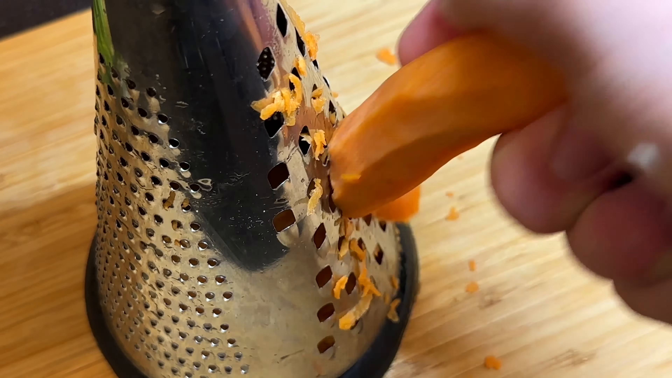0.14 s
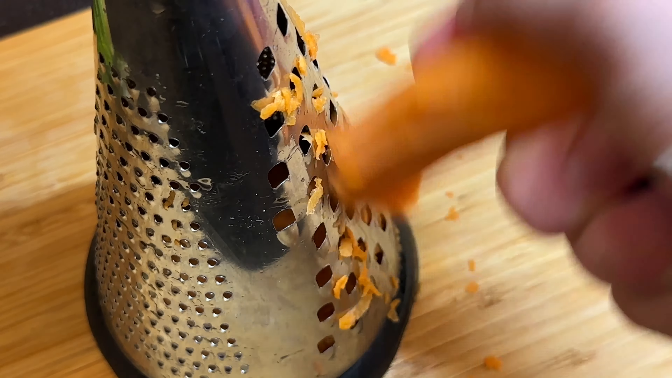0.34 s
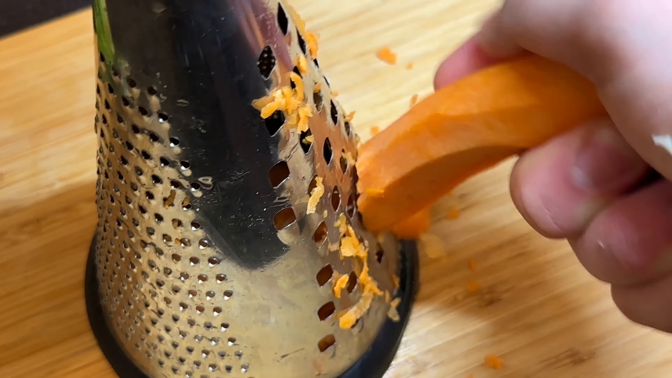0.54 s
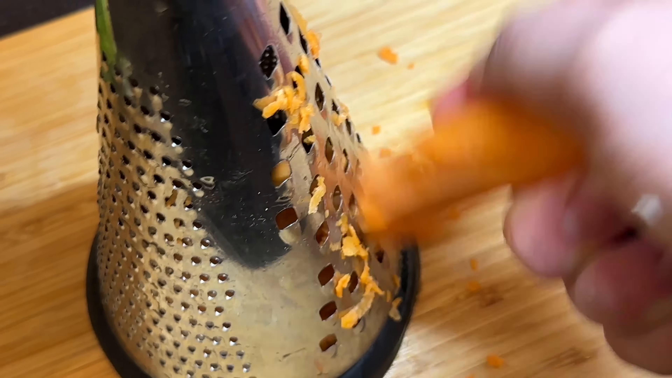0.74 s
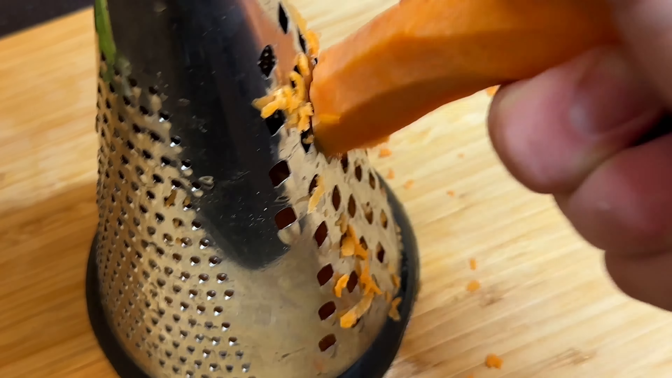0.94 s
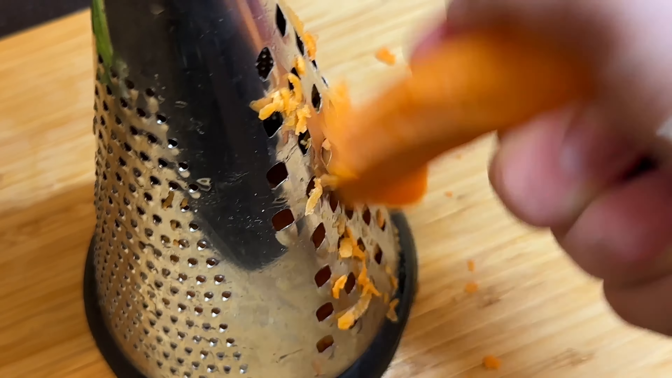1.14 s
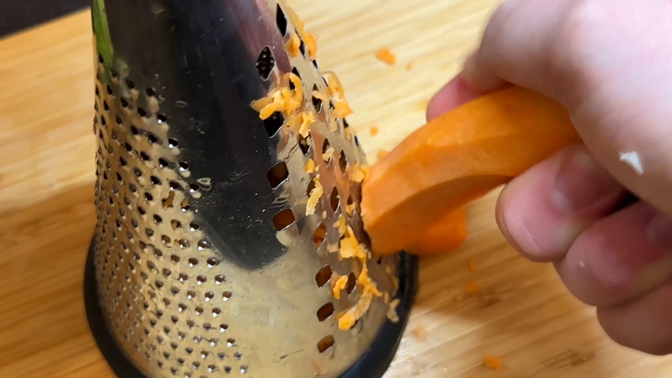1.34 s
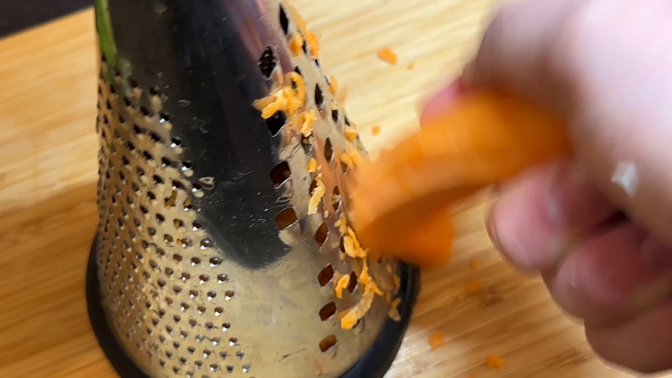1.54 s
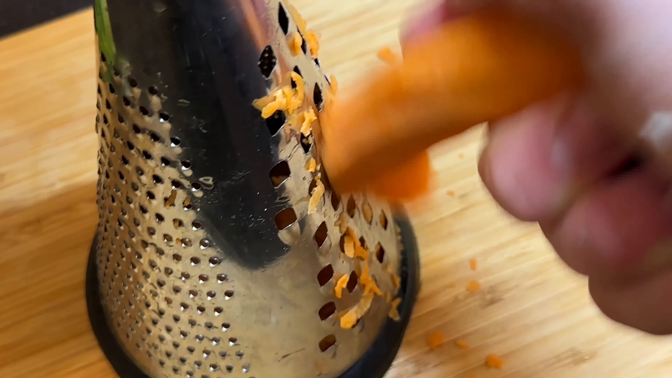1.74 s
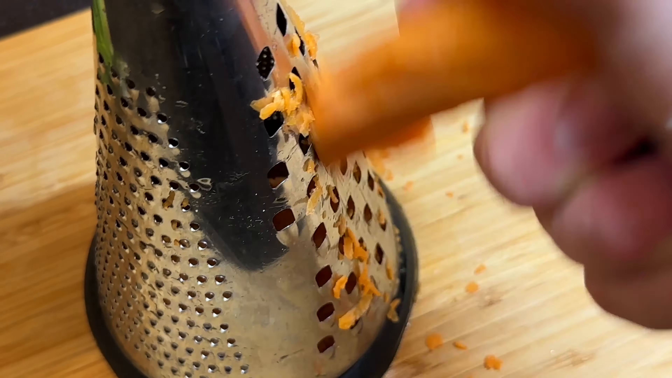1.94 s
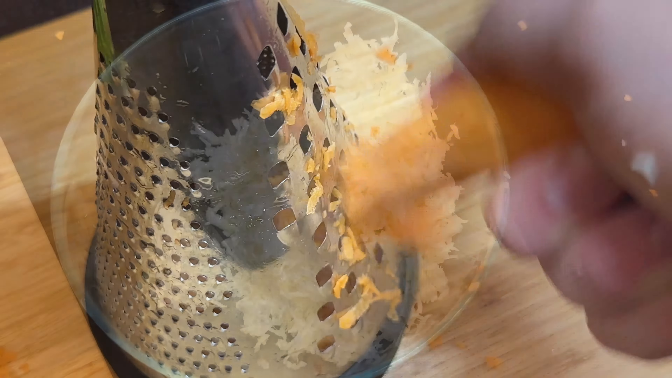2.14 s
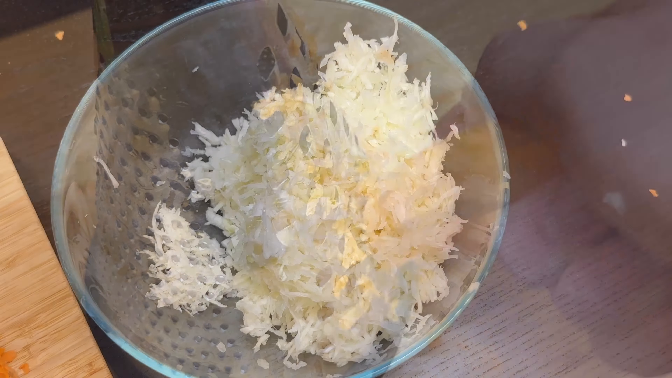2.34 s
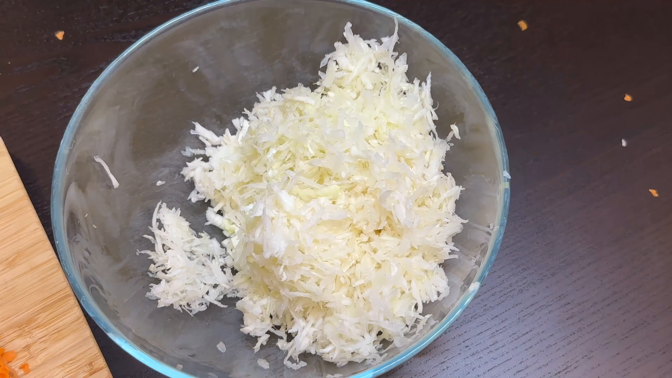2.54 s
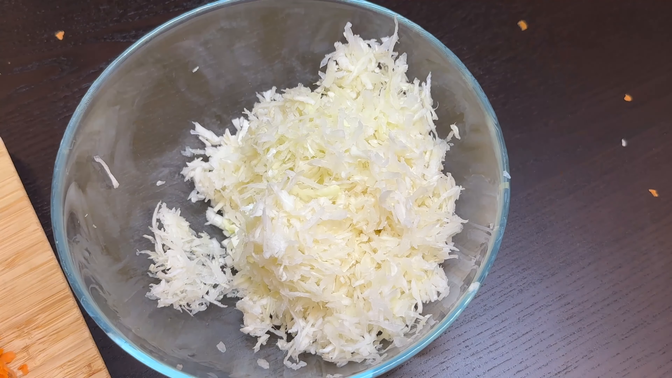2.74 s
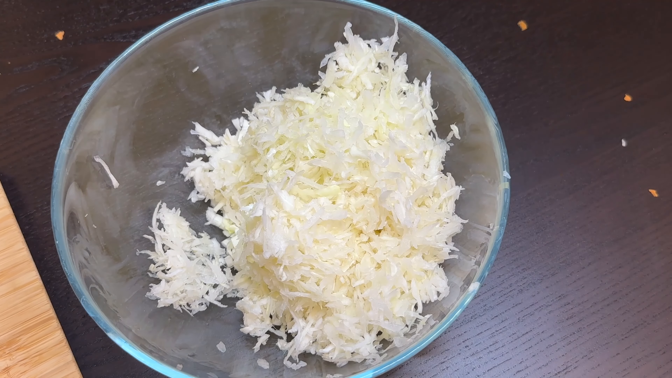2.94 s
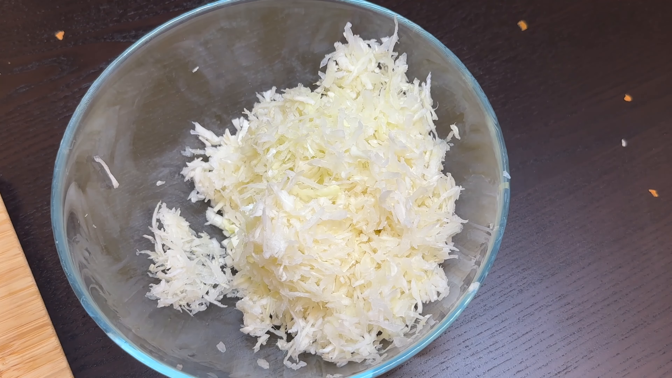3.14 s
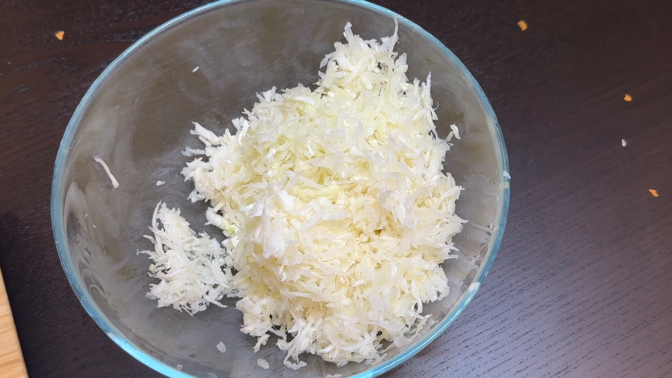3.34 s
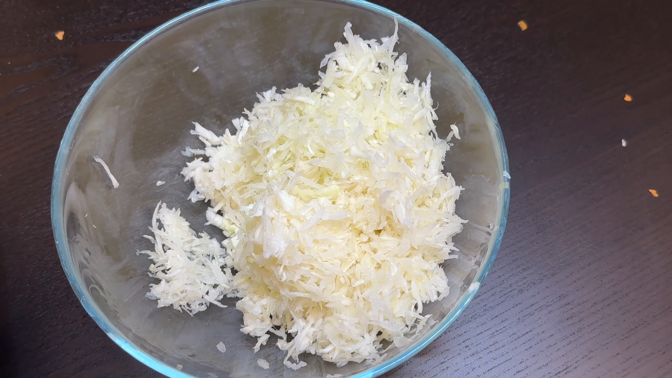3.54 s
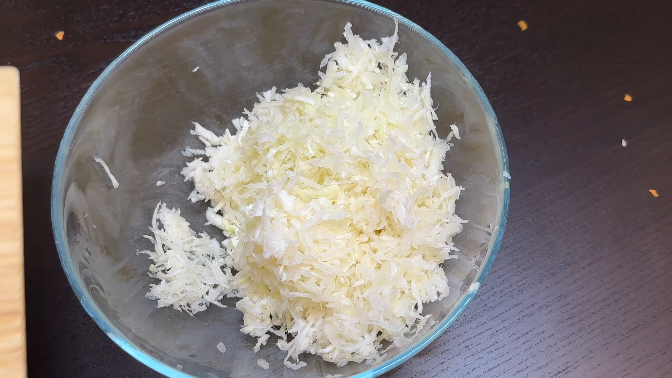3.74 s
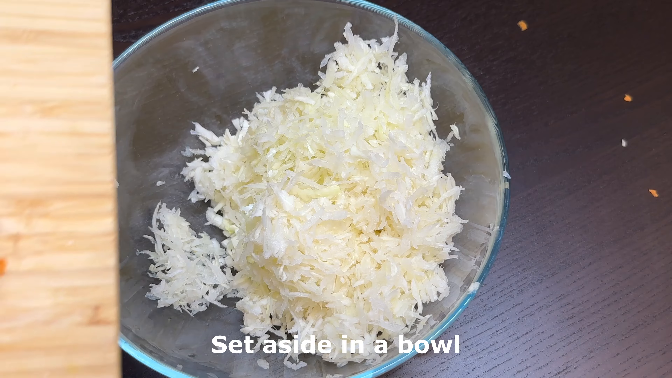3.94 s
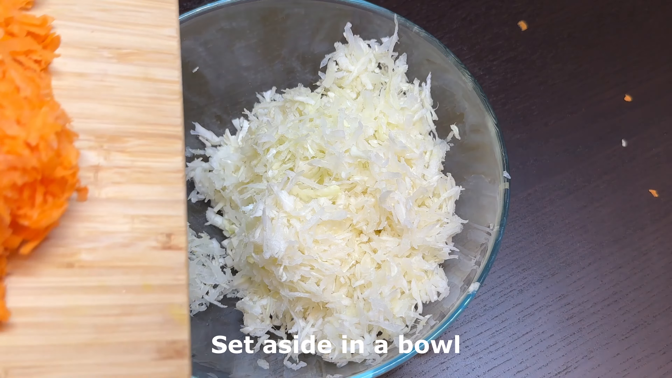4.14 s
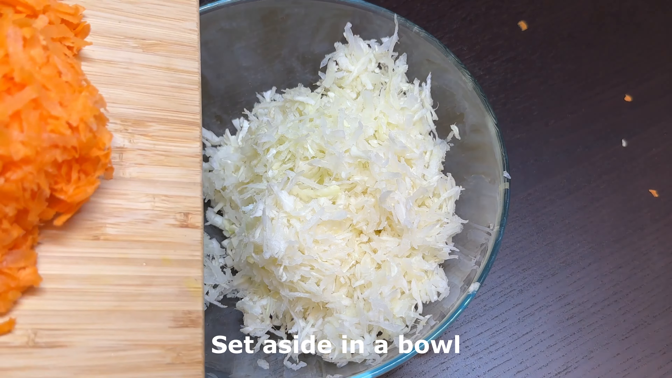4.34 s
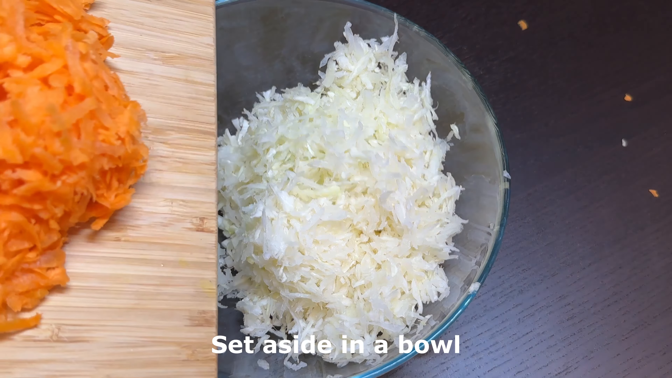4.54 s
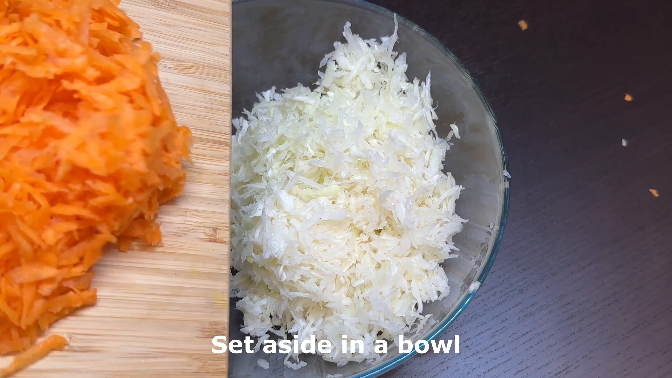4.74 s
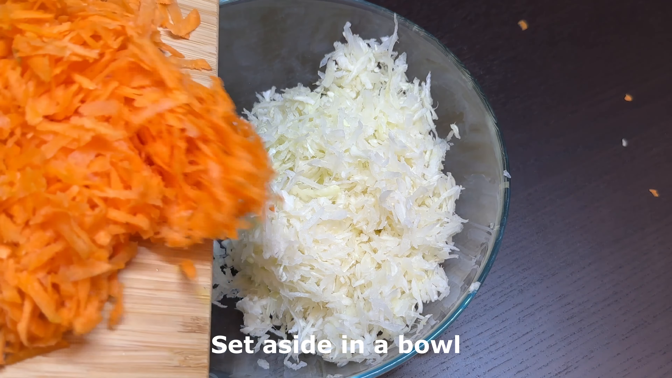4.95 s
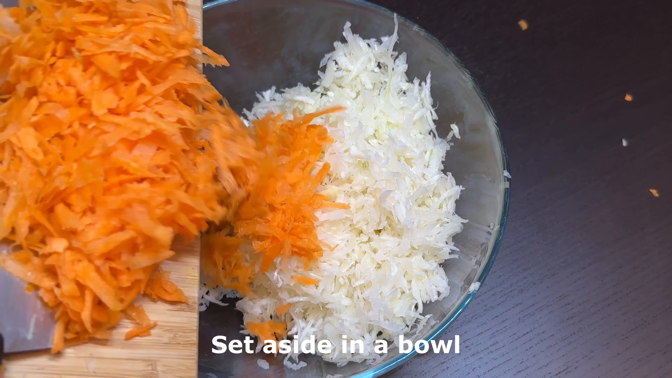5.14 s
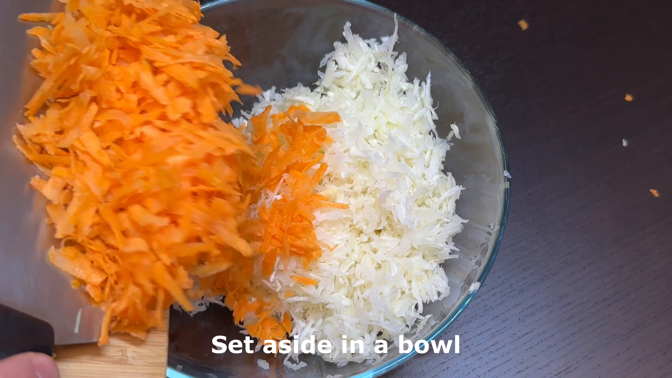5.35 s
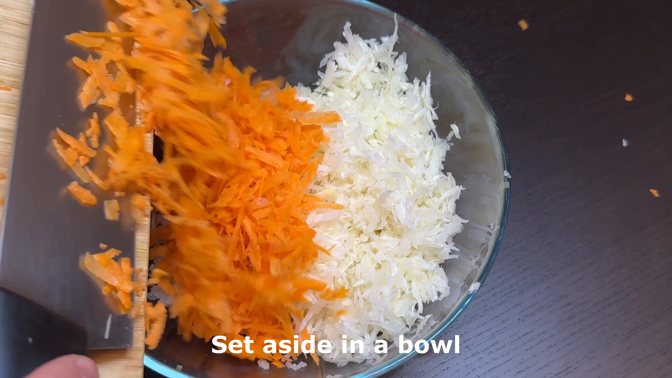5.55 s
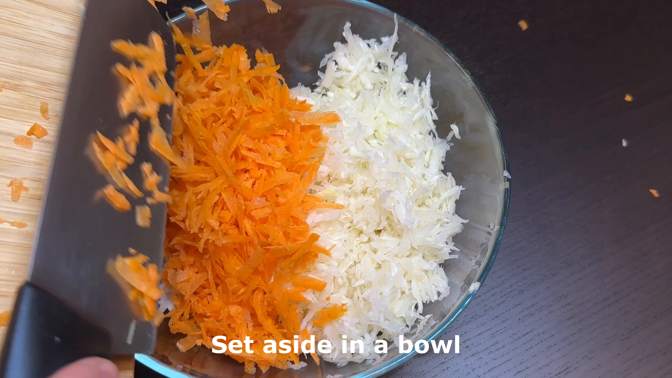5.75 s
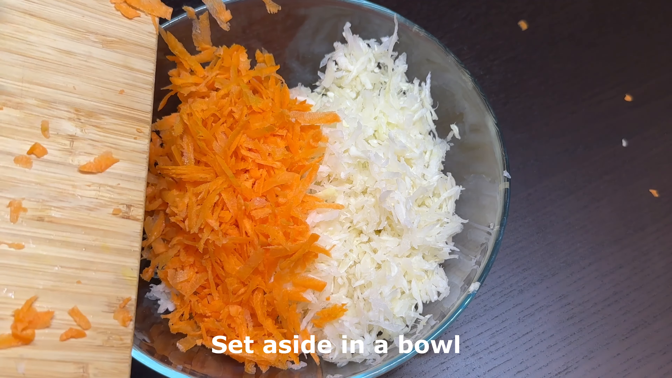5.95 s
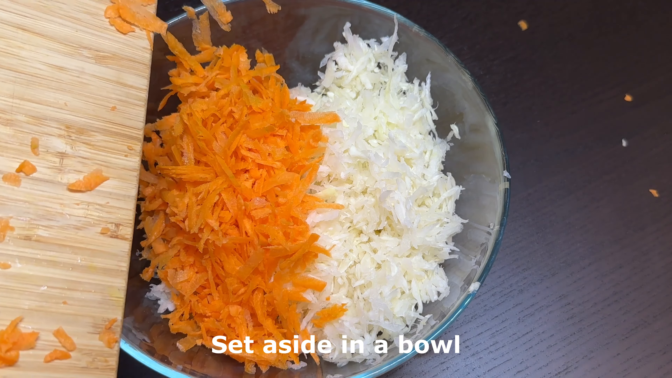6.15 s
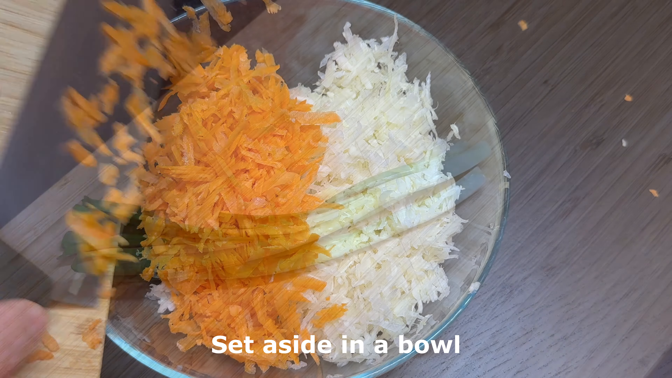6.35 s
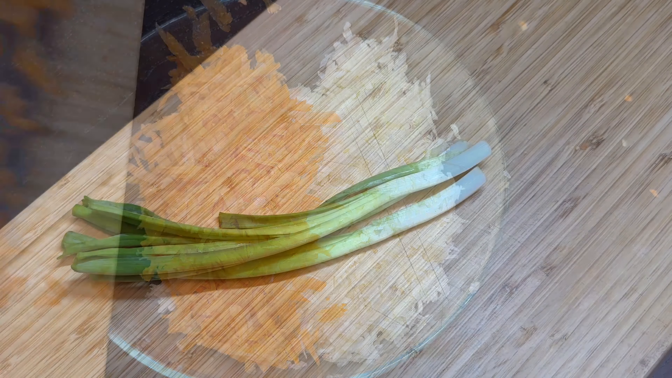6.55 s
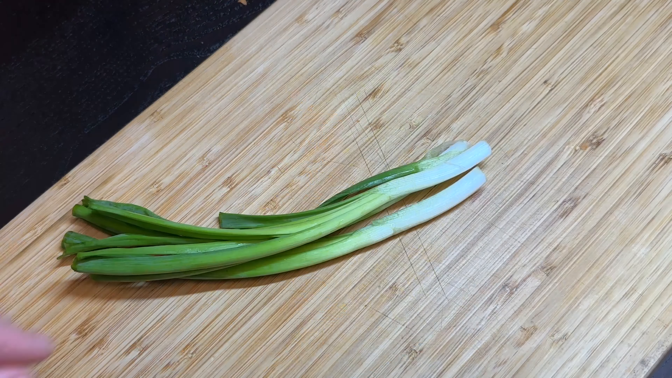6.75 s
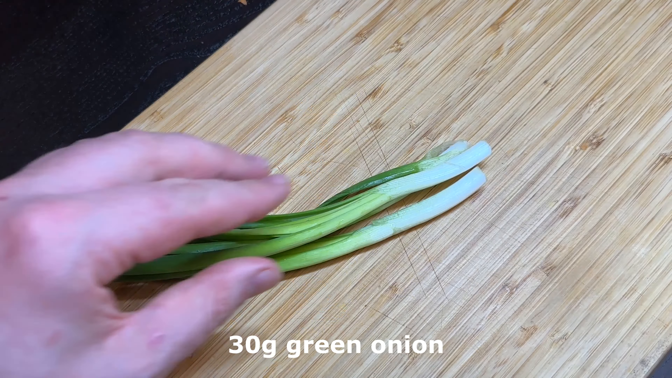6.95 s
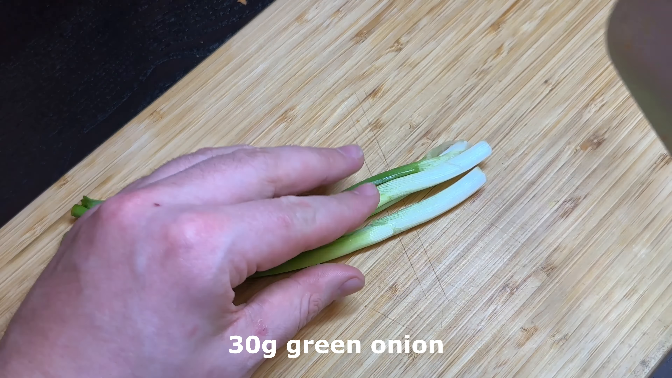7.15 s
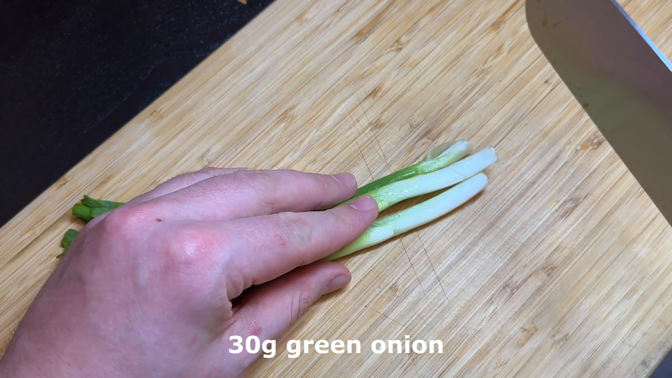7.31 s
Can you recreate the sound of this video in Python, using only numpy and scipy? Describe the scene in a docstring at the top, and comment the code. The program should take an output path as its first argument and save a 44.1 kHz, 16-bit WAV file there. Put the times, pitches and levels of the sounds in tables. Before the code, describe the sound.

A carrot is rasped rapidly on a ringing steel grater, then a board drags, knocks a glass bowl, and a blade scrapes shreds off.

```python
"""In a small kitchen a carrot is grated on a steel cone grater: hard down strokes bite, light ones slide back.
Then a wooden board is dragged over the table and knocks against a glass bowl, a knife sweeps the shreds
off it, and a hand brushes wood and spring onions. Random cracks and noise drive resonant bodies for grating
and rubbing; decaying modes make the knocks. A short echo and a phone close by shape the sum."""
import sys
import numpy as np
from scipy import signal
from scipy.fft import rfft, irfft, next_fast_len
from scipy.io import wavfile
from scipy.ndimage import uniform_filter1d

SR = 44100
rng = np.random.default_rng(int(sys.argv[2]) if len(sys.argv) > 2 else 0)


def store_wav(level_fs):
    """Save 16-bit WAV to argv[1]."""
    pcm = np.round(np.clip(np.atleast_2d(level_fs), -1, 1) * 32767)
    wavfile.write(sys.argv[1], SR, pcm.T.astype(np.int16))


N = 329859
TIME = np.arange(N) / SR
SIZE = next_fast_len(N + SR)
FREQ = np.maximum(np.arange(SIZE // 2 + 1) * SR / SIZE, 1)

# Down strokes of the carrot. Each row: start in seconds, length in seconds, share of the way at which
# it is fastest, drive in dB, thump of the hand in dB before its rise and decay.
STROKES = [(-0.1, 0.13, .6, -39.5, -26.5), (0.136, 0.098, .62, -26.5, -29), (0.38, 0.13, .52, -25, -22),
           (0.636, 0.15, 0.36, -24.5, -25), (0.916, 0.13, 0.54, -24, -21.5), (1.177, 0.14, 0.53, -24, -28),
           (1.445, .123, 0.46, -25.5, -26.5), (1.704, .121, .52, -25, -25.5), (1.947, 0.13, 0.55, -25, -30),
           (2.195, 0.14, 0.55, -25.5, -32), (2.452, 0.11, 0.41, -31.5, -40)]
# Rings of the steel cone. Each row: frequency in Hz, width in Hz, relative level in dB.
GRATER_MODES = [(677, 100, 5.5), (830, 52, 5), (1004, 100, 8), (1700, 320, 9), (1860, 90, 12.5),
                (2270, 150, 6.5), (2380, 110, 6), (2631, 130, 5.5), (3108, 82, 8), (3474, 200, 3.5),
                (4084, 87, 7), (4740, 100, -0.5), (5430, 200, -2.5), (6100, 200, 2), (7240, 60, -1.5),
                (7520, 140, 1)]
# Rings of the knife blade. Each row: frequency in Hz, width in Hz, relative level in dB.
BLADE_MODES = [(1812, 200, -0.5), (3185, 340, 5), (3550, 200, -6.5), (5770, 440, 2.5), (8150, 600, 0)]


def undb(db):
    """Decibels to gain."""
    return 10 ** (np.asarray(db) / 20)


def unit(x):
    """Scale to rms 1."""
    return x / np.sqrt(np.mean(x ** 2))


def across(points):
    """Join (Hz, value) points on a log-frequency axis."""
    hz, value = np.transpose(points)
    return np.interp(np.log(FREQ), np.log(hz), value)


def butter(x, hz, kind, order=2):
    """Butterworth filter."""
    sos = signal.butter(order, np.minimum(hz, SR / 2 - 1), kind, fs=SR, output="sos")
    return signal.sosfilt(sos, x)


def decay(t, t60):
    """Exponential decay that loses 60 dB in t60 seconds."""
    return np.exp(-np.log(1000) * t / t60)


def add(track, s, sound):
    """Mix a sound into the track from time s."""
    i = max(int(s * SR), 0)
    track[i:i + len(sound)] += sound[:N - i]


def steady(x, seconds):
    """Even out the slow swell of x and keep its grain."""
    mean_power = np.abs(uniform_filter1d(x ** 2, int(seconds * SR)))
    return x / np.sqrt(mean_power + 1e-6)


def body(x, colour=None, modes=()):
    """Pass x through a causal body with a broad colour and resonances; rms 1."""
    power = undb(across(colour)) ** 2 if colour else 1e-9
    for hz, width, db in modes:
        detuning = (FREQ ** 2 - hz ** 2) / (FREQ * width)
        power = power + undb(db) ** 2 / (1 + detuning ** 2 / 2) ** 2
    # folding the log spectrum into positive time gives the minimum-phase response
    cepstrum = irfft(np.log(power), SIZE)[:SIZE // 2]
    cepstrum[0] /= 2
    response = np.exp(rfft(cepstrum, SIZE))
    return unit(irfft(rfft(x, SIZE) * response, SIZE)[:N])


def wandering(x, modes, swell_db, rate):
    """Ring the modes with x; as the contact point moves, each one swells and fades on its own."""
    out = 0
    for hz, width, db in modes:
        b, a = signal.iirpeak(hz, hz / (1.5 * width), fs=SR)
        knots = rng.standard_normal(512)
        swell = undb(db + swell_db * np.clip(knots, -2, 2))
        ring = signal.lfilter(b, a, signal.lfilter(b, a, x))
        out = out + np.interp(TIME * rate, np.arange(len(knots)), swell) * ring
        # bending waves reach each mode a moment apart
        x = np.roll(x, 13)
    return unit(out)


def cracks(rate, spread_db):
    """Tiny fractures at random moments (rate per second), their sizes spread exponentially in dB."""
    happens = rng.random(N) < rate / SR
    size = undb(spread_db * np.minimum(rng.exponential(size=N), 4))
    return unit(happens * size * rng.choice([-1, 1], N))


def pressure(events, attack_share, release_s):
    """Gain of rubbing movements: each builds up over a share of its length, holds, then dies away."""
    power = np.zeros(N)
    for start, length, db in events:
        attack = 1 - np.exp(-(np.maximum(TIME - start, 0) / (attack_share * length)) ** 2)
        release = np.exp(-np.maximum(TIME - start - length, 0) / release_s)
        power += (undb(db) * attack * release) ** 2
    return np.sqrt(power)


def rubbing(gain, colour, modes, rate, spread_db, catch_db, catch_hz):
    """Friction: dense slips into a body, catching and freeing unevenly."""
    catching = unit(butter(rng.standard_normal(N), catch_hz, "low"))
    return gain * body(cracks(rate, spread_db) * undb(catch_db * catching), colour, modes)


def blows(events, modes, crack_db, crack_t60, waver=0.8, waver_rate=55):
    """Each blow rings decaying, wavering modes over a dense crack; a softer contact takes the treble away."""
    out, t = np.zeros(N), TIME[:SR // 2]
    for s, db, contact_hz in events:
        ring = 0
        for k, (hz, g, t60) in enumerate(modes):
            # the phase drifts as a random walk
            drift = np.cumsum(rng.standard_normal(size=128))
            phase = waver * np.interp(t * waver_rate, np.arange(len(drift)), drift - drift[0])
            sine = np.sin(2 * np.pi * hz * t + phase)
            ring = ring + (-1) ** k * undb(g) * sine * decay(t, t60)
        crack = undb(crack_db) * rng.standard_normal(len(t)) * decay(t, crack_t60)
        blow = butter(ring + butter(crack, 54, "high"), contact_hz, "low", order=3)
        add(out, s, undb(db) * blow / np.abs(blow).max())
    return out


def hiss():
    """Quiet steady floor: coloured noise."""
    # Each row: frequency in Hz, relative level in dB.
    hiss_colour = [(100, -0.5), (1000, -8), (2200, 5), (4500, -3.5), (8000, -16.5), (11000, -22)]
    return undb(-79.5) * body(rng.standard_normal(N), hiss_colour)


def room_rumble():
    """Low rumble of the room and the held phone: dark noise whose level dips for a moment."""
    # Each row: frequency in Hz, relative level in dB.
    rumble_colour = [(20, -21), (55, -1), (130, -1.5), (290, -10), (430, -22), (800, -28.5), (2000, -41)]
    lull = swing(3.3, 4.25, 4.45) ** 2
    return undb(-62.5 - 18 * lull) * body(rng.standard_normal(N), rumble_colour)


def hand_brushes():
    """Hands brush wood and leaves: dense fine slips with a broad colour."""
    # Each row: start in seconds, length in seconds, level in dB.
    brushes = [(3.04, 0.23, -57.5), (3.33, 0.16, -68.5), (6.69, 0.14, -62.5), (6.965, 0.041, -70.5),
               (7.07, 0.12, -77.5)]
    # Each row: frequency in Hz, relative level in dB.
    brush_grain = [(200, -6.5), (700, 2), (1300, 0), (2500, -1), (5000, -7), (8000, 1.5), (11000, -9)]
    gain = pressure(brushes, attack_share=0.18, release_s=0.0443)
    return rubbing(gain, brush_grain, (), rate=4000, spread_db=2.5, catch_db=1.5, catch_hz=40.16)


def ticks(t60=0.029, ring_db=-20, ring_t60=0.091):
    """Blade and board edge tick: short band-passed noise snaps with the blade ringing faintly behind."""
    # Each row: time in seconds, peak in dB, nominal band frequency in Hz.
    contacts = [(3.126, -25.5, 8140), (3.418, -42.5, 8300), (3.838, -37.5, 9000), (3.852, -39, 8020),
                (4.076, -41, 7060), (4.188, -59, 7260), (4.23, -38.5, 3510), (3.55, -57, 4500),
                (4.267, -48, 3950), (4.667, -53, 4000), (5.614, -33.5, 5010), (5.625, -38.5, 4860),
                (5.724, -53.5, 2490), (6.162, -35, 3700), (6.351, -33, 5350)]
    out, t = np.zeros(N), TIME[:SR // 4]
    blade = body(rng.standard_normal(N), modes=BLADE_MODES)
    for k, (s, db, hz) in enumerate(contacts):
        snap = rng.standard_normal(len(t)) * decay(t, t60)
        ring = undb(ring_db) * blade[k * len(t):(k + 1) * len(t)] * decay(t, ring_t60)
        tick = butter(snap + ring, [hz / 1.57, hz * 1.16], "band", order=1)
        add(out, s, undb(db) * tick / np.abs(tick).max())
    return out


def knife(width=0.097):
    """Sweeps rasp over wet shreds, light glides make the blade sing, and short skids give a faint pitch."""
    # The knife pushes wet shreds over the board. Each row: start in seconds, length in seconds, level in dB.
    sweeps = [(4.15, 0.073, -62.5), (4.5, 0.81, -73), (5.01, 0.075, -64.5), (5.45, 0.049, -54.5),
              (5.51, 0.074, -57.5), (6.08, 0.13, -67.5), (6.203, 0.036, -44.5), (6.25, 0.078, -60)]
    # The edge glides lightly over the wood. Each row: start in seconds, length in seconds, level in dB.
    glides = [(3.86, 0.11, -63), (4.22, 0.11, -67.5), (4.65, 0.36, -82), (5.22, 0.068, -64.5),
              (5.3, 0.27, -67), (6.19, 0.15, -66.5)]
    # The blade skids on the wet board with a faint pitch. Each row: start in seconds, length in seconds,
    # level in dB before the fade in and out, pitch in Hz.
    skids = [(4.222, 0.022, -53.5, 860), (4.343, 0.073, -70, 910), (4.729, .055, -62, 3840),
             (5.666, 0.038, -58.5, 1036), (5.669, 0.031, -58.5, 2060)]
    # Colour of the rasp. Each row: frequency in Hz, relative level in dB.
    blade_grain = [(300, 0.5), (1000, -6.5), (2200, -2), (4000, 1), (6500, -8), (10500, 0.5), (12000, -24)]
    sweep_gain = pressure(sweeps, attack_share=0.1, release_s=0.015)
    scrape = rubbing(sweep_gain, blade_grain, (), rate=7000, spread_db=1.5, catch_db=2.0, catch_hz=70)
    glide_gain = pressure(glides, attack_share=.28, release_s=.06)
    sing = glide_gain * wandering(rng.standard_normal(N), BLADE_MODES, swell_db=7.5, rate=22)
    out = scrape + sing
    for s, length, db, hz in skids:
        count = int(length * SR)
        band = [hz / (1 + width), hz * (1 + width)]
        skid = butter(rng.standard_normal(SR // 4), band, "band")[-count:]
        add(out, s, undb(db) * unit(skid) * np.hanning(count))
    return out


def board_drag():
    """Shoves of the board over the table: sparse slips shake its resonances."""
    # Each row: start in seconds, length in seconds, level in dB.
    shoves = [(2.57, 0.024, -64), (2.755, 0.077, -56.5), (2.79, 0.071, -45), (2.89, 0.061, -47.5),
              (3.1, 0.087, -49.5), (3.262, 0.045, -52), (6.72, .15, -65)]
    # Each row: frequency in Hz, relative level in dB.
    drag_grain = [(60, 9), (300, -15), (1200, -1.5), (4500, -12), (10000, -30.5)]
    # Each row: frequency in Hz, width in Hz, relative level in dB.
    drag_modes = [(136, 100, 11.5), (328, 91, 10), (490, 63, 7), (633, 76, 9), (873, 39, 5.5),
                  (1600, 185, 4.5), (2100, 100, -2), (2650, 77, -1), (3630, 370, -5)]
    gain = pressure(shoves, attack_share=0.15, release_s=0.036)
    return rubbing(gain, drag_grain, drag_modes, rate=1900, spread_db=-1, catch_db=2.0, catch_hz=60.7)


def board_bumps():
    """Soft bumps ring the wooden board on the table, with most of the treble taken away."""
    # Each row: time in seconds, peak in dB, contact corner in Hz.
    bumps = [(3.127, -36, 872), (4.505, -45, 905), (4.532, -18, 545), (5.001, -23, 297), (5.408, -39, 252),
             (6.075, -37.5, 465), (6.794, -37.5, 501)]
    # Each row: frequency in Hz, relative level in dB, t60 in seconds.
    board_modes = [(95.2, -1.5, 0.47), (121.3, 9.5, 0.087), (192, -2.5, 0.36), (237, -0.5, 0.27),
                   (275, -6.5, 0.29), (311, 4, 0.18), (522, 4.5, 0.041), (611, 1.5, 0.12),
                   (830, 9.5, 0.056), (1136, -1, 0.14)]
    return blows(bumps, board_modes, crack_db=14.0, crack_t60=0.2)


def bowl_knocks():
    """The board knocks hard against the glass bowl and rings its modes."""
    # Each row: time in seconds, peak in dB, contact corner in Hz.
    knocks = [(3.839, -32, 1460), (3.852, -14.5, 2200), (3.857, -15.5, 1780), (3.917, -27.5, 1200),
              (6.351, -30.5, 3504), (6.3535, -35.5, 590), (6.362, -33.5, 600), (6.401, -34.5, 1940)]
    # Each row: frequency in Hz, relative level in dB, t60 in seconds.
    bowl_modes = [(203, -9.5, .25), (323.2, -1, 0.37), (553, 0.5, 0.1), (752, 1, 0.06), (817, -6, 0.26),
                  (1019, -7.5, 0.048), (1658, -13, 0.16), (1596, 8, 0.052), (1656, 5, 0.12),
                  (1710, -11.5, 0.56), (2130, 3, 0.05), (2670, -6, 0.27), (2930, -11.5, 0.3)]
    return blows(knocks, bowl_modes, crack_db=19.5, crack_t60=0.074)


def swing(start, fastest, end):
    """A movement that gathers speed from rest and stops again, 0-1."""
    return np.sin(np.pi * np.interp(TIME, [start, fastest, end], [0, .5, 1])).clip(0)


def movements():
    """Down strokes and the lighter slides back: (start s, fastest s, end s, drive dB)."""
    turn_low_s, turn_top_s = .014, .012  # overlap of the two movements at the bottom and at the top
    back_db, back_fastest = -11.5, .6  # drive against the down stroke; share of the way at which it is fastest
    down = [(s, s + share * length, s + length, db) for s, length, share, db, _ in STROKES]
    back = []
    for (_, _, bottom, db), (top, *_) in zip(down, down[1:]):
        start, end = bottom - turn_low_s, top + turn_top_s
        back.append((start, start + back_fastest * (end - start), end, db + back_db))
    return down + back


def table_thumps(hz=53, t60=0.2, rise_s=0.0032, lag_s=0.016):
    """The table top swings slowly as the hand's weight lands, lag_s after each down stroke is fastest."""
    out, t = np.zeros(N), TIME[:SR // 2]
    for (start, length, share, _, db), detune in zip(STROKES, rng.standard_normal(len(STROKES))):
        sway = np.sin(2 * np.pi * hz * (1 + 0.05 * detune) * t)
        envelope = (1 - np.exp(-t / rise_s)) * decay(t, t60)
        add(out, start + share * length + lag_s, undb(db) * sway * envelope)
    return out


def catches(hz=1850, width_hz=330, rise_s=.003):
    """Around a movement's fastest moment a tooth bites deep and shudders in the cone's strong resonances."""
    peak_db, spread_db = 3.5, 1.5  # peak against the movement's drive, and its scatter
    reach = .2  # furthest from the fastest moment, as a share of the movement
    out, t = np.zeros(N), TIME[:SR // 16]
    modes = [(hz, width_hz, 8)] + list(GRATER_MODES[1:8])
    shudder = body(rng.standard_normal(N), modes=modes)
    envelope = (t / rise_s) ** 2 * np.exp(-t / rise_s)  # largest after 2 * rise_s
    for start, fastest, end, db in movements():
        for side in (-1, 1):
            s = fastest + side * rng.random() * reach * (end - start)
            i = rng.integers(N - len(t))
            twang = shudder[i:i + len(t)] * envelope
            level = undb(db + peak_db + spread_db * rng.standard_normal())
            add(out, s - 2 * rise_s, level * twang / np.abs(twang).max())
    return out


def bites(speed, rate, spread_db):
    """One push each time the carrot meets a tooth: closer together when it moves fast."""
    chance = rng.standard_normal((2000, 2))  # columns: uneven spacing, uneven size
    travel = np.cumsum(rate * speed / SR)
    at = np.searchsorted(travel, np.arange(len(chance)) + .35 * chance[:, 0])
    pushes = np.zeros(N + 1)
    pushes[at] = undb(spread_db * np.clip(chance[:, 1], -2, 2))
    return pushes[:N]


def grating_power():
    """Power with which the carrot works on the steel, and its speed, over time."""
    # The carrot snags on the teeth on its way back up. Each row: start in seconds, length in seconds, drive in dB.
    snags = [(0.314, 0.023, -33), (0.533, 0.016, -36), (0.592, .012, -36.5), (1.645, 0.017, -38)]
    scuff_db, scuff_s = -24.5, 0.082  # drive against the stroke, half length
    power, speed = np.zeros(N), np.zeros(N)
    for start, fastest, end, db in movements():
        pace = swing(start, fastest, end)
        # once the teeth are fully in, more speed adds little
        power += undb(db) ** 2 * np.tanh(1.64 * pace ** 3.09)
        speed += pace
    for start, length, _, db, _ in STROKES:
        # at the bottom the carrot stays on the steel and scuffs as it turns
        bottom = start + length
        power += (undb(db + scuff_db) * swing(bottom - scuff_s, bottom, bottom + scuff_s)) ** 2
    power += pressure(snags, attack_share=.2, release_s=0.0057) ** 2
    return power, speed


def grating():
    """Each tooth tears a shred in a burst of cracks that ring the cone; its push shakes the stand."""
    # Colour of tearing carrot. Each row: frequency in Hz, relative level in dB.
    tear_colour = [(200, -8.5), (500, -3), (1250, -1.5), (2900, -7), (4500, -2.5), (6500, 1.5), (8500, -1),
                   (10300, -0.5), (12000, -15)]
    # Grater and board shake together. Each row: frequency in Hz, width in Hz, relative level in dB.
    stand_modes = [(74.6, 43, 3), (117, 27, 0.5), (135, 20, 2.5), (205, 46, 3), (303.4, 38, 2.5),
                   (335, 67, -3.5), (451, 38, -2), (629, 25, -7)]
    power, speed = grating_power()
    pushes = bites(.4 + speed, rate=130, spread_db=1.5)
    tearing = signal.lfilter([1], [1, -np.exp(-1 / (0.0056 * SR))], pushes)
    tearing = steady(tearing + .4 * tearing.mean(), 0.017)
    rasp = body(cracks(rate=9000, spread_db=-0.5) * tearing ** 0.5, tear_colour)
    ring = wandering(cracks(rate=4000, spread_db=3.5) * tearing, GRATER_MODES, swell_db=5.0, rate=45)
    jolts = pushes * rng.choice([-1, 1], N) + 0.056 * cracks(rate=1500, spread_db=2.5)
    shake = body(jolts, modes=stand_modes)
    steel = undb(-2.5) * steady(rasp, 0.18) + undb(-3.0) * steady(ring, 0.24)
    # the heavy stand keeps shaking a little after the stroke
    lag = np.exp(-1 / (0.0046 * SR))
    stand_force = np.sqrt(signal.lfilter([1 - lag], [1, -lag], power))
    return np.sqrt(power) * steel + undb(-7) * stand_force * steady(shake, 0.12)


def kitchen(x, wet_db=-7, t60_low=.4, t60_high=0.06):
    """A short diffuse echo of decaying noise; its side part makes the two ports hear it differently."""
    # Side part of the echo. Each row: frequency in Hz, gain in dB.
    room_side = [(70, -16.5), (330, -6.5), (850, 5.5), (2000, -19.5), (3500, -12.5), (8000, 0)]
    t = TIME[:SR // 2]
    tails = []
    for noise in rng.standard_normal((2, len(t))):
        low = butter(noise, 600, "low", order=1)
        tail = low * decay(t, t60_low) + .5 * (noise - low) * decay(t, t60_high)
        build_up = 1 - np.exp(-t / 0.018)
        tails.append(tail * build_up / np.sqrt(SR * t60_low / (2 * np.log(1000))))
    mid, side = (undb(wet_db) * signal.fftconvolve(x, tail)[:N] for tail in tails)
    side = irfft(rfft(side, SIZE) * undb(across(room_side)), SIZE)[:N]
    return np.array([x + mid + side, x + mid - side])


def scene():
    """All the work on the table, the kitchen around it and its quiet floor."""
    grating_fade = np.interp(TIME, (2.025, 2.511), [1, 0])  # from, to in seconds
    grater = (grating() + catches() + table_thumps()) * grating_fade
    board = board_drag() + board_bumps() + bowl_knocks()
    work = grater + board + ticks() + knife() + hand_brushes()
    return kitchen(work + room_rumble()) + hiss()


def record(dry, ceiling=0.46, low_cut_hz=30, top_hz=11200):
    """The phone drops deep bass, rounds peaks, lets its ports drift apart in treble phase and cuts the top."""
    # Phase by which the left port leads the right. Each row: frequency in Hz, phase in radians.
    port_phase = [(20, 0), (5000, 0), (6100, -.6), (7000, -1.2), (8500, -1.7), (10000, -2.2), (11000, -2.9)]
    rounded = ceiling * np.tanh(butter(dry, low_cut_hz, "high") / ceiling)
    turn = np.exp(.5j * across(port_phase) * np.array([[1], [-1]]))
    ports = irfft(rfft(rounded, SIZE) * turn, SIZE)[:, :N]
    return signal.sosfilt(signal.ellip(8, .2, 70, top_hz, fs=SR, output="sos"), ports)


dry = scene()
out = record(dry)
store_wav(out)
```